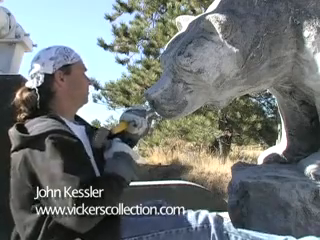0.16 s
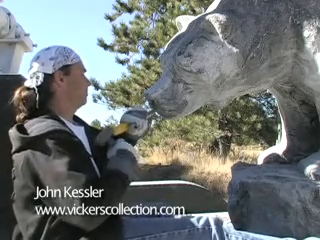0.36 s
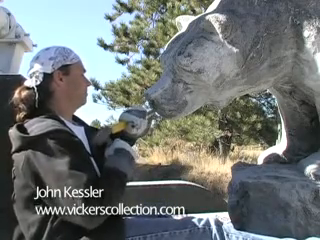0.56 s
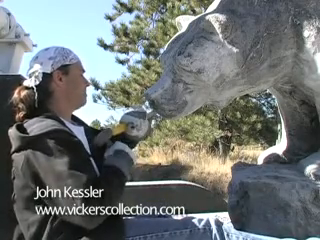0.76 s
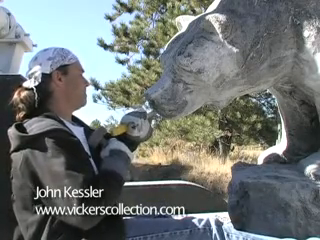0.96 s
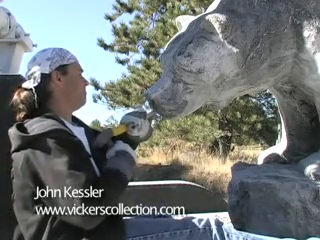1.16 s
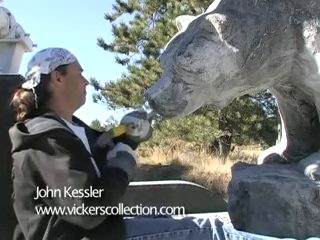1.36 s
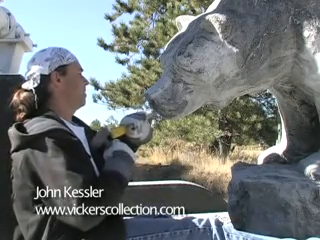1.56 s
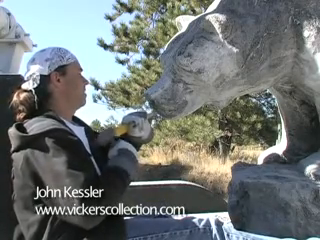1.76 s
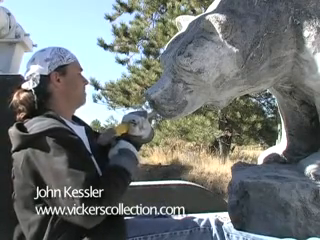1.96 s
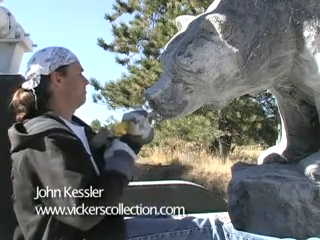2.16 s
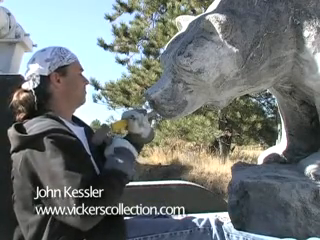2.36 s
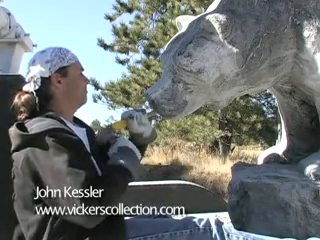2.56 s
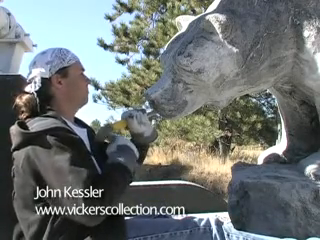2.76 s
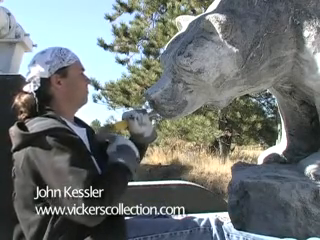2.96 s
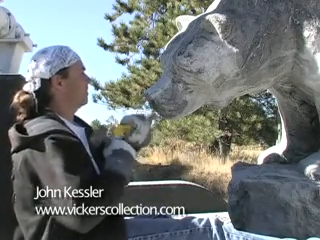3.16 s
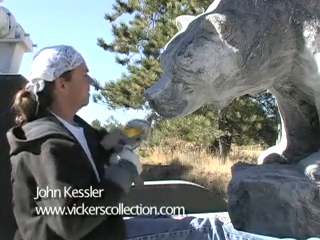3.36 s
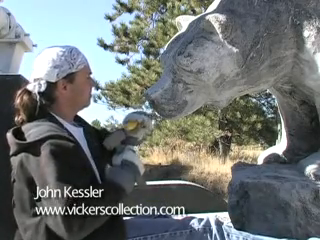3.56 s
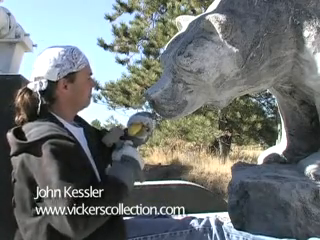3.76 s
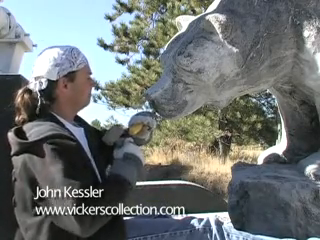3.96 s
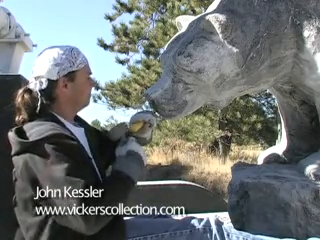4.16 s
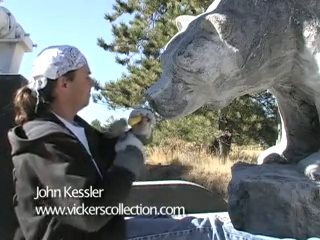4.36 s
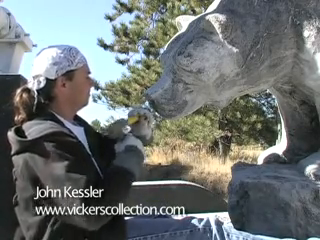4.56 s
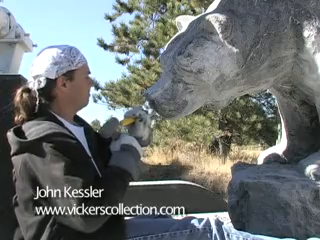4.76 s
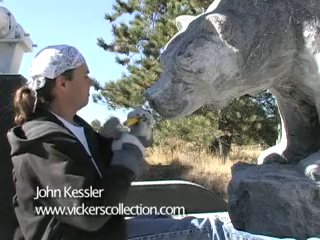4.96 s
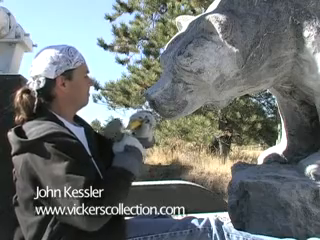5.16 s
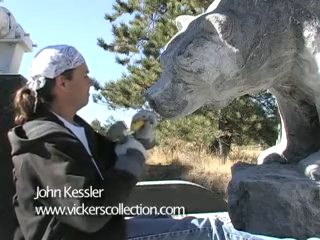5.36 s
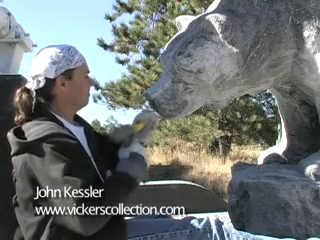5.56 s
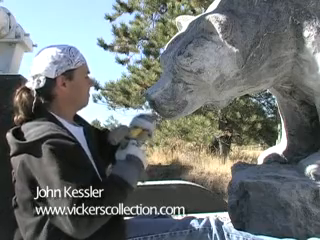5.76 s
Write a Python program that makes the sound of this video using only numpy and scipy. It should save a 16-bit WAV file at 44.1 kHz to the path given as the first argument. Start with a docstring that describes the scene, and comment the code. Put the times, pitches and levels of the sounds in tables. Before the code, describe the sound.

Close, dry carving: brief rubble falls first, then sharp chisel knocks in twos and threes on hollow-ringing stone, with scratchy skitters and ticks.

```python
"""Lumps of stone thud and crumble at the start, then a steel chisel taps a large stone figure in groups of two and three.
Each blow is a spring-like thrust, bursts of tiny fractures and decaying modes of the figure and its base.
Between blows the edge skitters, rasps and catches: uneven slips drive the chisel's resonances and faintly the stone.
Landing lumps mix a ground thump, a noise thud and fractures, with clustered crumbs over a fading trickle.
Scattered noise reflections and almost still air, a swelling rumble under a thin hiss, surround the work."""
import sys
import numpy as np
from scipy import signal
from scipy.fft import rfft, irfft, next_fast_len
from scipy.io import wavfile
from scipy.ndimage import map_coordinates

SR = 44100
rng = np.random.default_rng(int(sys.argv[2]) if len(sys.argv) > 2 else 0)


def unload_wav(signal):
    """Save mono or channel-first audio to the path in sys.argv[1] as 16-bit WAV at rate SR, clipped to [-1, 1]."""
    wavfile.write(
        sys.argv[1],
        SR,
        np.round(np.clip(np.atleast_2d(signal).T, -1, 1) * 32767).astype(np.int16),
    )


N = 256441

# hammer blows; the faintest only seat the edge:
# (time [s], force [dB], thrust pitch [Hz], favoured ring pitch [Hz], crushing time [s])
HAMMER_BLOWS = [(0.4889, -2, 1780, 1140, 0.0073), (0.681, 1, 1440, 1020, 0.0067),
                (0.8567, 1.95, 1900, 1120, 0.0045), (1.2772, -3, 1650, 990, 0.0046),
                (1.4575, 6, 1633, 972, 0.0036), (1.703, -26.5, 1760, 1010, 0.019),
                (1.8692, -6.5, 1800, 1250, 0.012), (2.067, 0.5, 1670, 1084, 0.0023),
                (2.448, -19, 1610, 1300, 0.0093), (2.677, -7, 1860, 1190, 0.0093),
                (2.877, -1.5, 1400, 990, 0.0042), (3.081, 3, 1550, 1265, 0.0024),
                (3.971, -24, 1300, 1020, 0.008), (4.2151, -8, 1370, 1150, 0.0052),
                (4.4075, 0, 1750, 940, 0.0086), (4.6168, 1.5, 1590, 1115, 0.0032),
                (4.968, -24.5, 1460, 980, 0.0069), (5.152, -4.5, 1690, 1150, 0.0087),
                (5.371, -1.5, 1390, 1070, 0.0061), (5.5777, -0.5, 2080, 1280, 0.0051)]
# resonances of the chisel, damped by a gloved hand: (nominal frequency [Hz], width [Hz], nominal level [dB])
CHISEL_MODES = [(1173, 500, -2), (2890, 650, -2), (3440, 210, 0), (3870, 240, -3.5), (4580, 244, -1.5),
                (5570, 830, -4.5), (6250, 900, -1.5), (6880, 120, 3.5), (8555, 180, 2.5),
                (11440, 1200, -12.5)]
# spectrum of a heavy thud: (frequency [Hz], relative level [dB])
THUD_SPECTRUM = [(30, -10), (60, -11), (88, 5.5), (130, -4.5), (190, -5), (235, -9), (310, -4), (480, -9.5),
                 (900, -26), (2000, -70.5)]
# spectrum of falling crumbs: (frequency [Hz], relative level [dB])
CRUMB_SPECTRUM = [(290, -12), (500, 0.5), (1000, -0.5), (1400, -0.5), (2400, -3.5), (3800, -4.5),
                  (4800, -19.5), (8500, -21.5), (12500, -21.5)]


def amp(db):
    """Decibels to gain."""
    return 10 ** (np.asarray(db) / 20)


def unit(x):
    """x at rms 1."""
    return x / np.sqrt(np.mean(x ** 2) + 1e-20)


def along(points, hz):
    """(Hz, value) points read on a log frequency axis."""
    f, v = np.transpose(points)
    return np.interp(np.log(hz + 1), np.log(f), v)


def clock(length):
    """Sample times over a length in seconds."""
    return np.arange(int(length * SR)) / SR


def add(track, s, sound):
    """Mix a sound into the track at time s, cut at the track's end."""
    part = track[max(round(s * SR), 0):][:len(sound)]
    part += sound[:len(part)]


def filtered(x, response):
    """x through a complex response of frequency."""
    m = next_fast_len(len(x) + SR // 10)
    return irfft(rfft(x, m) * response(np.fft.rfftfreq(m, 1 / SR)), m)[:len(x)]


def coloured(x, spectrum):
    """x through a (Hz, dB) spectrum, at rms 1."""
    return unit(filtered(x, lambda hz: amp(along(spectrum, hz))))


def resonance(f, hz, width):
    """A causal band-pass response with a peak of 1."""
    return 1j * f * width / (hz * hz - f * f + 1j * f * width)


def grains(size, rate, spread_db):
    """Tiny fractures at random moments (rate per second), of random sizes and either sign."""
    happens = rng.random(size) < rate / SR
    sign = rng.choice([-1, 1], size)
    return happens * sign * amp(spread_db * np.clip(rng.standard_normal(size), -2, 2))


def burst(spectrum, envelope):
    """Dense fractures under an envelope, holding the envelope's energy."""
    fractures = coloured(grains(len(envelope), rate=9000, spread_db=5.5), spectrum)
    return unit(fractures * envelope) * np.sqrt(np.mean(envelope ** 2))


def air(swell_db=2):
    """A low rumble, gently swelling, under a thin hiss: shaped noise whose low end alone is modulated."""
    # spectrum of the still air: (frequency [Hz], relative level [dB])
    air_spectrum = [(12, -30.5), (20, -13.5), (67, -13.5), (147, -28), (455, -33.5), (596, -33),
                    (823, -32.5), (1110, -36.5), (1950, -44), (2350, -45), (12500, -53.5), (16200, -89),
                    (22000, -120)]
    noise = amp(-57) * coloured(rng.standard_normal(N), air_spectrum)
    rumble = filtered(noise, lambda hz: 1 / (1 + (hz / 150) ** 4))
    # smooth curve through a random point every 8000 samples
    swell = map_coordinates(rng.standard_normal(N // 8000 + 4), [np.arange(N) / 8000])
    return noise + rumble * (amp(swell_db * swell) - 1)


def landing(ground_hz=87, ground_db=-17, ground_t60=0.65, shatter_t60=0.059):
    """A lump shatters in dense fractures and thumps the ground: a decaying tone and a noise thud."""
    thud_db, thud_t60 = -4.5, 0.15  # the t60s are in s
    t = clock(0.54)
    thump = np.sin(2 * np.pi * ground_hz * t) * amp(ground_db - 60 * t / ground_t60)
    thud = coloured(rng.standard_normal(len(t)), THUD_SPECTRUM) * amp(thud_db - 60 * t / thud_t60)
    return thump + thud + burst(CRUMB_SPECTRUM, amp(-60 * t / shatter_t60))


def rubble():
    """Lumps land with a thud; each sheds a shower of crumbs over a fading trickle and a low settling rumble."""
    # lumps of stone landing: (time [s], impact gain [dB], crumb level [dB], time crumbs keep coming [s])
    lumps = [(0.001, -19, -42, 0.018), (0.113, -37, -43, 0.029), (0.291, -35, -45.5, .06)]
    crumbs_t60 = 0.23  # s
    trickle_db, fade_db_per_s = -46, 21.5
    settle_db = 0  # relative to the trickle
    out, t = np.zeros(N), np.arange(N) / SR
    trickle = amp(trickle_db - fade_db_per_s * t)
    flow = trickle ** 2  # power of all falling debris
    for s, impact_db, crumbs_db, hold in lumps:
        add(out, s, amp(impact_db) * landing())
        shower = amp(crumbs_db - 60 * np.maximum(t - hold, 0) / crumbs_t60)
        add(flow, s, shower ** 2)
    # crumbs land in clusters of a few milliseconds
    cluster_decay = amp(-60 * clock(.02) / 0.0061)
    clusters = signal.fftconvolve(grains(N, rate=150, spread_db=2.5) ** 2, cluster_decay)[:N]
    patter = grains(N, rate=1700, spread_db=2.5) * np.sqrt(np.abs(clusters) + 0.13)
    settling = amp(settle_db) * trickle * coloured(rng.standard_normal(N), THUD_SPECTRUM)
    return out + np.sqrt(flow) * coloured(patter, CRUMB_SPECTRUM) + settling


def surroundings(x, count=20):
    """Scattered reflections as decaying noise tails, each band with its own decay; every stretch gets a new tail."""
    # decay of the reflections: (frequency [Hz], t60 [s])
    reflection_decay = [(100, .35), (300, 0.78), (1000, 0.047), (2000, 0.092), (4000, 0.051),
                        (12000, 0.045)]
    out = np.zeros(N)
    for piece in np.array_split(np.arange(N), count):
        hz, t, z = signal.stft(rng.standard_normal(SR // 2), SR, nperseg=256)
        fading = amp(-60 * t / along(reflection_decay, hz)[:, None])
        tail = signal.istft(z * fading, SR, nperseg=256)[1]
        reflected = signal.fftconvolve(x[piece], tail / np.linalg.norm(tail))
        add(out, piece[0] / SR + .005, reflected)
    return out


def setting(s):
    """The chisel, set anew for each group of blows: its row at time s without the start time."""
    # (start time [s], knock offset [dB], grit offset [dB], relative skitter level [dB],
    #  treble lift of the edge [dB], squeak pitch [Hz], squeak strength [dB])
    settings = [(0, -1.5, -2, -63.5, -4, 3110, 10), (1.25, 1, -3, -73.5, -9, 2835, 10),
                (1.65, -2.5, -0.5, -68.5, -4.5, 2860, 9.5), (2.4, -1.5, 3, -63.5, -5, 3030, 6.5),
                (3.8, 4.5, 2.5, -58, -3, 4245, 6.5), (4.9, 1.5, 5.5, -60.5, 3, 4550, 3)]
    return settings[sum(row[0] <= s for row in settings[1:])][1:]


def thrust(t, hz, t60=0.007, rebound=0.0029, rebound_db=-7):
    """Hammer and chisel spring against the stone, and meet once more a moment later."""
    push = lambda u: np.sin(2 * np.pi * hz * u) * amp(-60 * u / t60)
    delay = rebound * rng.uniform(0.93, 1.6)
    return -push(t) - amp(rebound_db) * push(np.maximum(t - delay, 0))


def shank(t, t60=0.024):
    """The chisel's upper modes ring on briefly in the glove."""
    hz = np.array([mode[0] for mode in CHISEL_MODES[4:-1]])[:, None] * rng.uniform(1.0, 1.04)
    tones = np.sin(2 * np.pi * hz * t) * rng.random(hz.shape)
    return np.sum(tones, axis=0) * amp(-60 * t / t60)


def figure(knock_db, ring_db, centre_hz, focus_db=6, scatter_db=2.5, rise=0.00095, split_hz=6, twin_db=-6):
    """The figure's modes ring in close, beating pairs; the spot struck favours those near one pitch."""
    # modes of the stone figure: (frequency [Hz], relative level [dB], t60 [s])
    stone_modes = [(112.8, -20, 0.56), (194, -20.5, 0.96), (236, -19.5, 0.5), (299.04, -6, 0.38),
                   (382.9, -13.5, 0.19), (448.2, -12, 0.19), (491.7, -11.5, .24), (566, -12.5, 0.46),
                   (670, -20.5, .19), (715.5, -7.5, 0.32), (814, -2.5, 0.12), (847, -10.5, 0.032),
                   (904.5, -3, 0.15), (976.5, -3.5, 0.24), (1018.7, 0.5, 0.14), (1108, -15.5, .14),
                   (1154, -7, .23), (1196.4, -2, .12), (1317.7, 4.5, 0.12), (1430, -9, 0.34),
                   (1463, -12.5, 0.085), (1535, -4, 0.12), (1663, -17.5, 0.2), (1622, -1, 0.13),
                   (1680, -13.5, 0.02), (1963, -16.5, .09), (2240, -8, 0.13)]
    t = clock(.7)
    hz, db, t60 = np.transpose(stone_modes)[:, :, None]
    favour = focus_db * np.exp(-(np.log(hz / centre_hz) / 0.18) ** 2)
    # long waves vary least from blow to blow
    chance = scatter_db * np.minimum(hz / 800, 1) * rng.standard_normal(hz.shape)
    # the knock sets the low modes, the ring the upper ones
    db = db + np.interp(hz, [570, 800], [knock_db + 7.0, ring_db - 6.5]) + favour + chance
    phase = 2 * np.pi * rng.random(hz.shape)
    twin_hz = hz + split_hz * rng.standard_normal(hz.shape)
    pair = np.sin(2 * np.pi * hz * t + phase) + amp(twin_db) * np.cos(2 * np.pi * twin_hz * t + phase)
    decay = np.exp(-np.log(1000) * t / t60) * (1 - np.exp(-t / rise))
    return np.sum(amp(db) * decay * pair, axis=0)


def crowd(low_hz=740, high_hz=2550, life=115, count=48):
    """The irregular block's crowd of weak modes, fainter towards the top, each losing 60 dB in `life` cycles."""
    t = clock(0.48)
    hz = low_hz * (high_hz / low_hz) ** rng.random((count, 1))
    phase = 2 * np.pi * rng.random((count, 1))
    size = np.minimum(1400 / hz, 1) ** 2
    modes = size * amp(-60 * t * hz / life) * np.sin(2 * np.pi * hz * t + phase)
    return np.sum(modes, axis=0) * np.minimum(t / .002, 1) / np.sqrt(count)


def boom(start_hz=190, end_hz=85, droop=0.026, swell=.016):
    """A bending wave spreads through the base: its longer waves arrive later, so the boom droops."""
    t = clock(.2)
    hz = end_hz + (start_hz - end_hz) * np.exp(-t / droop)
    u = t / (2 * swell)  # loudest at u = 1
    return np.sin(2 * np.pi * np.cumsum(hz) / SR) * u ** 2 * np.exp(1 - u ** 2)


def blows():
    """Each blow thrusts the edge in, crushes stone briefly and rings the figure; its force sets every level."""
    # spectrum of the crack of the edge going in: (frequency [Hz], relative level [dB])
    crack_spectrum = [(100, -16.5), (300, -9.5), (700, -11), (1200, -4), (1700, 1.5), (2100, -4.5),
                      (2700, -2.5), (3400, -5), (4200, -18), (6000, -44.5)]
    # spectrum of crushed stone: (frequency [Hz], relative level [dB])
    grit_spectrum = [(1500, -17), (3000, 5), (4400, 2.5), (5800, -0.5), (7100, 1), (7800, -2), (8700, -1.5),
                     (9900, -9.5), (12300, -13)]
    # how each part follows the force: (base level at force 0 dB [dB], slope [dB per dB of force])
    crack_law = (-17.5, 1.135)
    grit_law = (-21.5, 0.98)
    ring_law = (-25.5, 0.83)  # the figure's upper modes
    knock_law = (-36.5, .75)  # its low modes
    usual_crush_s, cushion_db = 0.0044, 2  # each doubling of the crushing time softens the crack by this much
    boom_db = -7  # relative to the knock
    out, t = np.zeros(N), clock(.15)
    for s, force_db, thrust_hz, centre_hz, crush in HAMMER_BLOWS:
        laws = (crack_law, grit_law, ring_law, knock_law)
        crack_db, grit_db, ring_db, knock_db = (db + slope * force_db for db, slope in laws)
        spot_knock_db, spot_grit_db = setting(s)[:2]
        crack_db -= cushion_db * np.log2(crush / usual_crush_s)
        grit_db += spot_grit_db
        knock_db += spot_knock_db
        cracking = amp(-60 * np.maximum(t - crush / 2, 0) / 0.022)
        crumbling = amp(-60 * np.maximum(t - crush, 0) / 0.0088)
        add(out, s, amp(crack_db + 5.5) * thrust(t, thrust_hz))
        add(out, s, amp(crack_db - 1.74) * burst(crack_spectrum, cracking))
        add(out, s, amp(grit_db - 5.5) * burst(grit_spectrum, crumbling))
        add(out, s, amp(grit_db - 18) * shank(t))
        add(out, s, figure(knock_db, ring_db, centre_hz))
        add(out, s, amp(ring_db + 3.0) * crowd())
        add(out, s, amp(knock_db + boom_db) * boom())
    return out


def chisel(force, lift_db, squeak_hz, squeak_db, grip=0.017, angle_db=2):
    """The steel's resonances shift with the grip and the angle of the edge; friction feeds a squeak."""
    chance = rng.standard_normal((len(CHISEL_MODES), 2))
    modes = [(hz * np.exp(grip * a), width, db + angle_db * b)
             for (hz, width, db), (a, b) in zip(CHISEL_MODES, chance)]
    # neighbouring modes have opposite signs
    steel = lambda f: sum((-1) ** k * amp(db) * resonance(f, hz, width)
                          for k, (hz, width, db) in enumerate(modes))
    squeak = lambda f: 1 + amp(squeak_db) * resonance(f, squeak_hz, 140)
    lift = lambda f: amp(lift_db * np.interp(f, [3500, 8000], [-.5, .5]))
    return filtered(np.pad(force, (0, SR // 40)), lambda f: steel(f) * squeak(f) * lift(f))


def slip(t60=0.013):
    """One slip of the edge: a sharp jolt and a little powdered stone as decaying noise."""
    t = clock(.03)
    force = rng.standard_normal(len(t)) * amp(-60 * t / t60)
    force[0] += 6
    return force


def stroke(start, length, slip_hz, drag_db, spread_db):
    """The edge sticks and slips unevenly over a steady drag: steel at rms 1, plus the stone it stirs."""
    stone_db = -7.5  # the figure's faint ring, relative to the steel
    force = amp(drag_db) * rng.standard_normal(len(clock(max(length, .02))))
    gaps = rng.gamma(2, .5 / slip_hz, size=50)
    for s in np.cumsum(np.append(0, gaps)):
        add(force, s, amp(spread_db * rng.standard_normal()) * slip())
    steel = unit(chisel(force, *setting(start)[3:]))
    sound = signal.fftconvolve(force, crowd())
    sound *= amp(stone_db) * np.linalg.norm(steel) / np.linalg.norm(sound)
    add(sound, 0, steel)
    return sound


def scraping():
    """The edge skitters in sparse ticks after every blow, rasps when pushed, and now and then catches harder."""
    # the edge pushed firmly over the stone: (time [s], length [s], relative level [dB])
    scrapes = [(0.744, 0.1, -52), (0.869, 0.17, -51), (1.081, .158, -60), (1.525, 0.03, -51.5),
               (2.268, .023, -52.5), (2.455, 0.023, -43), (2.495, 0.082, -52), (3.011, 0.077, -50.5),
               (3.123, .05, -41), (4.505, 0.11, -43), (4.735, 0.049, -49), (5.338, 0.04, -53.5),
               (5.405, 0.084, -49.5), (5.601, 0.088, -44.5)]
    # the edge catches on a grain: (time [s], relative peak [dB])
    catches = [(0.7813, -23), (0.8128, -27), (0.976, -35.5), (1.056, -38.5), (1.5377, -30), (2.2778, -32.5),
               (2.518, -33), (2.5461, -28.5), (2.722, -33), (2.7492, -36), (2.769, -31), (2.812, -35.5),
               (2.993, -33), (3.0123, -33), (3.0611, -32), (3.3243, -45), (3.6498, -44), (3.8984, -39.5),
               (4.152, -30), (4.331, -34.5), (4.7026, -32.5), (5.2037, -25.5), (5.539, -31.5),
               (5.6256, -25)]
    rebound_s, skitter_s = .045, .135  # off the stone after a blow, then skittering
    out = np.zeros(N)
    for s, *_ in HAMMER_BLOWS:
        skitter = stroke(s, skitter_s, slip_hz=87, drag_db=-18.5, spread_db=4.5)
        add(out, s + rebound_s, amp(setting(s)[2] - 6.0) * skitter)
    for s, length, db in scrapes:
        add(out, s, amp(db - 6.0) * stroke(s, length, slip_hz=150, drag_db=-13.5, spread_db=3.5))
    for s, db in catches:
        tick = chisel(slip(), *setting(s)[3:])
        add(out, s, amp(db - 6) * tick / np.abs(tick).max())
    return out


def scene():
    """Carving and rubble, close by, with faint reflections over the quiet air."""
    work = rubble() + blows() + scraping()
    return (work + amp(-16.0) * surroundings(work) + air())[None]


def record(dry):
    """A steep low-pass removes the treble above the band limit."""
    top_hz = 12400
    return filtered(dry[0], lambda hz: 1 / np.sqrt(1 + (hz / top_hz) ** 140))[None]


dry = scene()
out = record(dry)
unload_wav(out)
```